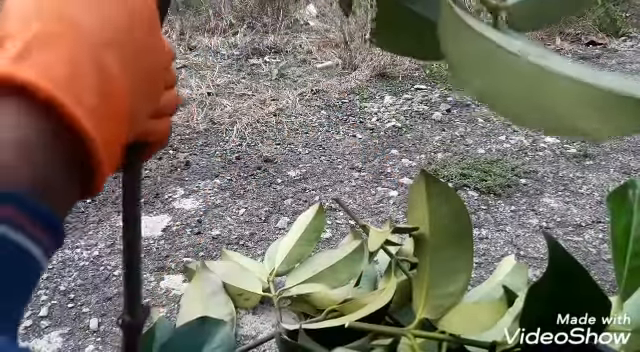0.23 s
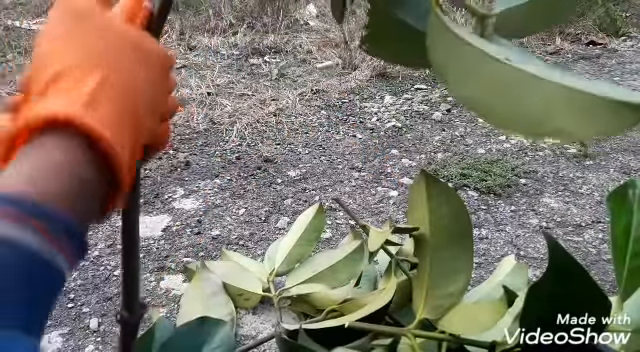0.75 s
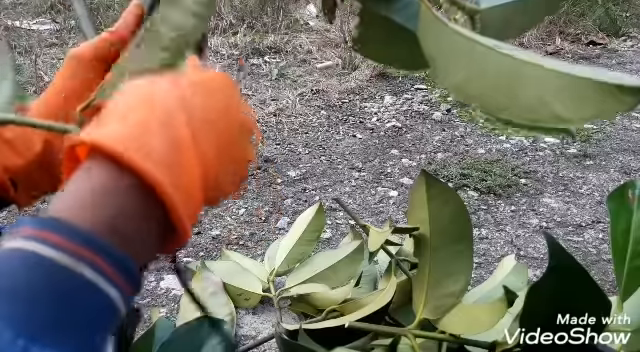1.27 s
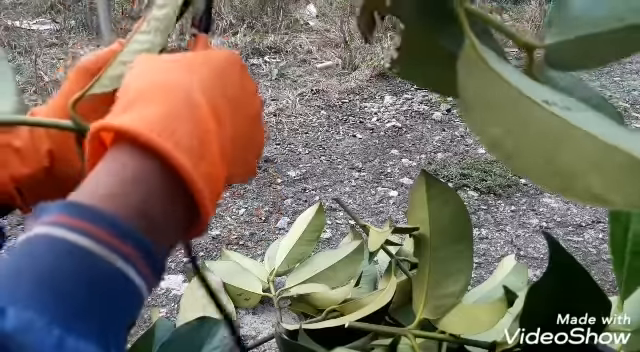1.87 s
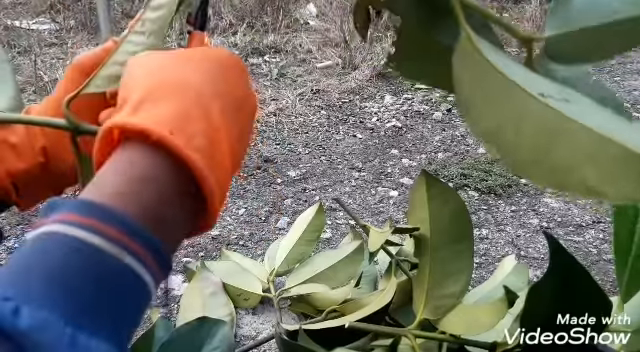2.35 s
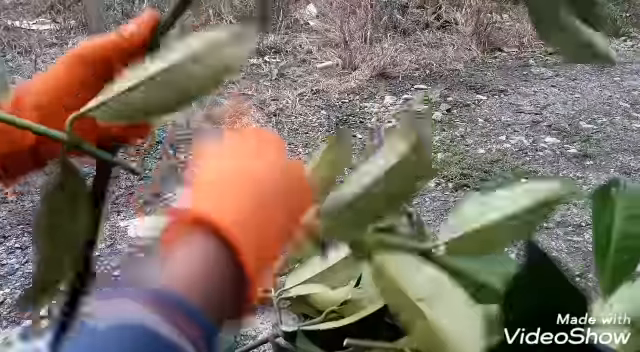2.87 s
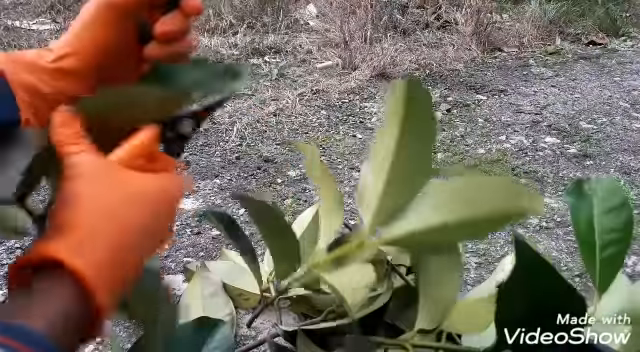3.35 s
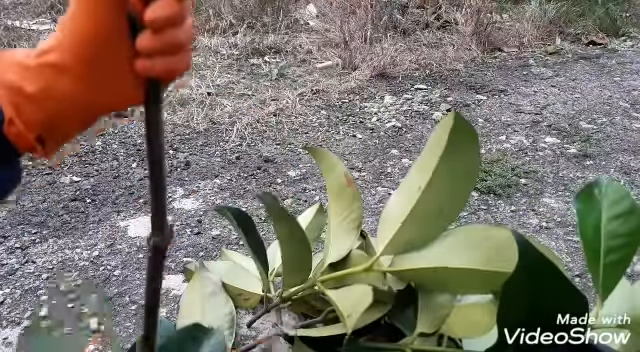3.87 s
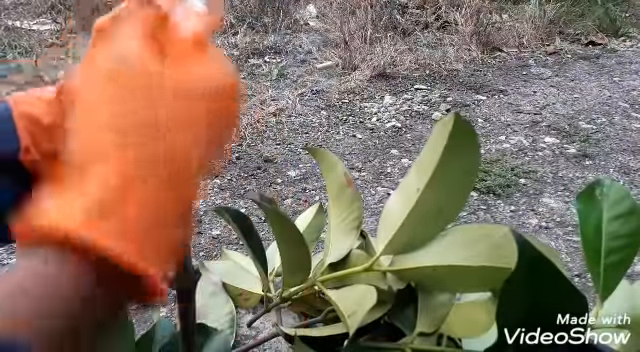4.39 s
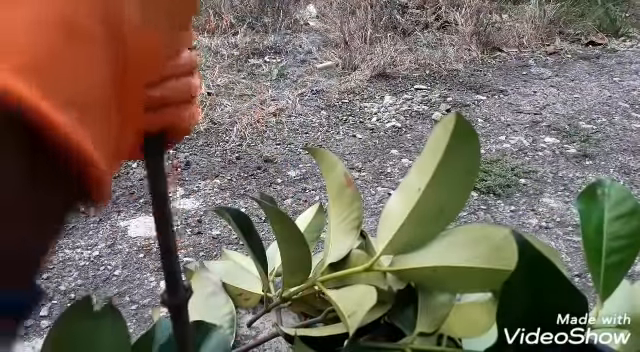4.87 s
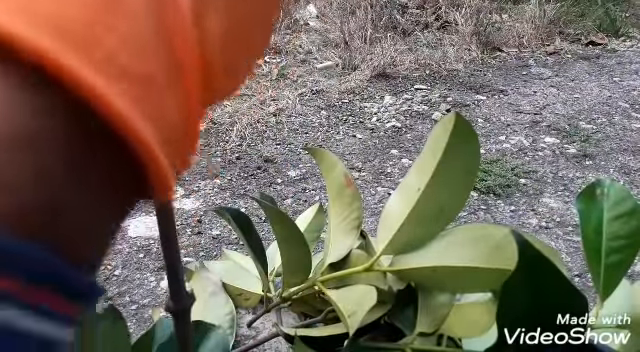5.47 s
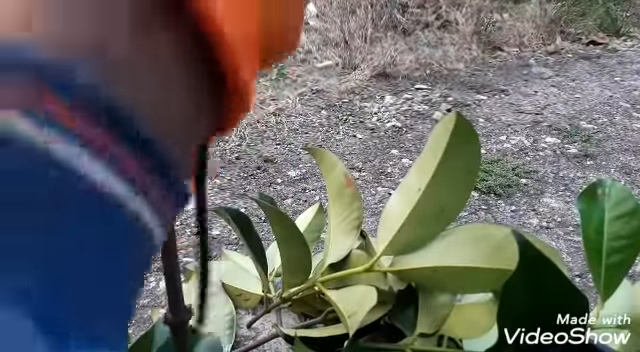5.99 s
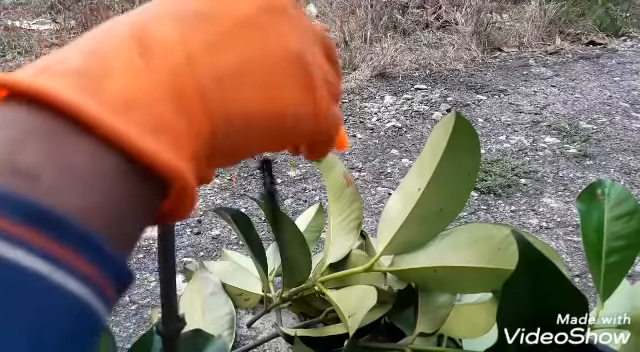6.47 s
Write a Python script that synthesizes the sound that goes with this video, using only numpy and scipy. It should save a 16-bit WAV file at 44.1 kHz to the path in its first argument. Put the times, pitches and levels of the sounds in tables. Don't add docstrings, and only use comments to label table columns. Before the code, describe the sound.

Cicadas sing steadily and a bush cricket chirps about five times a second above a soft far traffic rumble. Up close, stems tick and leaves stir, then a twig cracks sharply. After some knocks a second twig snaps crisply, its leaves shuddering. The branch scrapes, rustles and clatters down onto leaves and gravel, then only small touches remain. Dry open air, nearly mono.

```python
import sys
import numpy as np
from scipy import signal
from scipy.fft import rfft, irfft
from scipy.io import wavfile

SR = 44100
rng = np.random.default_rng(int(sys.argv[2]) if len(sys.argv) > 2 else 0)


def log_audio(samples):
    frames = np.atleast_2d(samples).T
    limited = np.clip(frames, -1, 1)
    pcm = np.round(limited * 32767).astype(np.int16)
    wavfile.write(sys.argv[1], SR, pcm)


def gain_from_db(level_db):
    decades = np.asarray(level_db, float) / 20
    return 10 ** decades


N = 297234

# (frequency [Hz], level [dB per Hz])
TRAFFIC_COLOUR = [(20, -12), (40, -11.5), (153, -3), (280, -11), (383, -12.5), (430, -15.5), (635, -22),
                  (687, -20.5), (920, -20), (1100, -23.5), (4200, -43), (5460, -79), (9240, -120)]
# (time [s], level [dB])
TRAFFIC_LEVEL = [(0, -51), (.9, -50), (2, -51.5), (2.7, -50.5), (2.95, -54), (3.3, -55), (3.45, -49),
                 (3.8, -50.5), (4.3, -51), (4.6, -51.5), (5.9, -52.5), (6.74, -51)]
AIR_DB = -70

# (time [s], near singer level [dB], upper pair level [dB])
CHORUS = [(0, -64, -61), (.6, -64, -61.5), (.9, -62.5, -58), (1.15, -65.5, -59.5), (1.9, -61, -58),
          (2.15, -59, -58), (2.6, -58.5, -61.5), (2.9, -65.5, -61), (3.4, -66.5, -62.5), (3.85, -65, -59),
          (4.3, -65, -60), (4.7, -62.5, -60.5), (5.25, -58.5, -61.5), (5.65, -62.5, -59), (5.84, -65, -60),
          (5.97, -61, -61), (6.4, -62.5, -60), (6.74, -63, -61)]
# (frequency [Hz], width [Hz], level [dB])
NEAR_SONG = [(4916, 590, -3), (5466, 770, -5)]
UPPER_SONG = [(7070, 580, 4.1), (8140, 760, 6.4)]
FAR_SONG = [(11000, 1450, -2), (11490, 410, 0.5)]
FAR_SONG_DB = -65
THROBS_PER_S, THROB_DB = 27, 2.2
SWELLS_PER_S, SWELL_PEAK_S, SWELL_DB = 5.22, 2.08, 2.6

# (first chirp [s], gap [s], peak [dB])
BOUTS = [
    (.0014, 0.19, -55.5),
    (.627, 0.19, -55.5),
    (1.4044, 0.2, -55),
    (2.2468, 0.21, -54),
    (2.8844, 0.21, -58),
    (3.7044, .1945, -54),
    (4.3061, 0.208, -54),
    (5.5558, 0.19, -55.5),
    (6.1554, 0.19, -55),
]
BOUT_CHIRPS = [3, 4, 4, 3, 4, 3, 6, 3, 3]
STROKE_DB = [-4, -1, 0, 0, -2, -8]
STROKE_GAP_S = 0.019
# (frequency [Hz], width [Hz], level [dB])
WING = [(12000, 1300, -12), (13300, 770, -10), (14750, 1300, -9), (15260, 600, -10)]

# (frequency [Hz], level [dB per Hz])
LEAF_BODY = [(150, -11), (250, -0.5), (346, 6.5), (681, 4), (865, -4.5), (2450, -10), (2810, -10.5),
             (5000, -14), (6500, -19), (11000, -120)]
LEAF_EDGE = [(2500, -5), (4500, -5), (5200, -2), (6400, -1), (7800, -4.5), (9400, -8), (11500, -11),
             (12800, -9), (16000, -22)]
# (peak time [s], peak [dB], rise [s], fall [s])
STIRS = [(0.0, -55.5, .05, 0.16), (.23, -62, 0.074, 0.067), (.43, -61, 0.066, 0.21), (.73, -52, 0.11, 0.37),
         (1.0, -43, 0.014, 0.02), (1.12, -53, 0.091, 0.064), (1.33, -54.5, 0.092, 0.19),
         (1.48, -56, 0.039, 0.45), (1.82, -58.5, .2, 0.18), (2.41, -60.5, 0.12, 0.11),
         (2.57, -59, 0.066, 0.41), (2.79, -48, 0.032, 0.35), (3.0, -40.5, 0.11, 0.068),
         (3.169, -46, 0.15, 0.047), (3.4, -50, 0.2, 0.23), (3.56, -47, 0.16, 0.18), (3.77, -52, 0.12, 0.23),
         (3.89, -43.5, 0.081, 0.12), (3.98, -49, .1, 0.14), (4.2, -50.5, 0.025, 0.14),
         (4.34, -56, 0.11, 0.17), (5.03, -56, 0.1, 0.13), (5.65, -55, 0.048, 0.3),
         (5.9, -55.5, 0.46, 0.071), (6.2, -53.5, 0.11, 0.11), (6.35, -58, 0.074, 0.043),
         (6.74, -55, 0.15, .1)]
STIR_SLOPE_DB, REST_DB = 11, -67.5
EDGE_REST_DB, EDGE_FOLLOWS = -73.5, 0.62
RUB_REST_HZ, RUB_TOP_HZ, RUB_OCTAVES_PER_DB = 1100, 2050, 0.14
CRACKLES_PER_S, CRACKLE_FOLLOWS, CRACKLE_DB = 10, 1.2, -63.5
# (start [s], top level [dB], rise [s], 60 dB decay [s], edge over body [dB])
SHUDDERS = [
    (0.749, -31, 0.013, 0.25, 3.5),
    (2.814, -31.5, 0.015, 0.24, 4),
]

# (time [s], peak [dB], frequency [Hz], 60 dB decay [s])
THUDS = [
    (.70, -48, 190, 0.088),
    (0.748, -32, 190, 0.16),
    (1.31, -42, 110, .1),
    (2.811, -31.5, 70, 0.09),
    (3.88, -38, 280, 0.054),
    (3.95, -48, 80, .15),
    (4.18, -46, 70, .12),
    (4.312, -41.5, 296, 0.055),
]
# (start [s], length [s], level [dB], from [Hz], to [Hz])
SCRAPES = [(4.2, 0.016, -39, 5600, 1200), (3.846, .017, -42.5, 4000, 4000),
           (3.823, 0.0196, -38, 2500, 1800), (2.9, .007, -48, 1900, 2800),
           (5.634, 0.022, -49.5, 2100, 2100), (5.657, .014, -54, 2200, 1200),
           (2.912, .016, -39.5, 2200, 1100), (2.982, .02, -44, 1800, 3000), (3.005, .016, -42.5, 695, 1830),
           (4.083, .02, -44.5, 1200, 2800), (4.208, 0.0143, -44.5, 1600, 2500),
           (0.8, 0.0079, -33, 1180, 1500), (.976, 0.0083, -39.5, 3360, 2600),
           (1.322, .012, -42, 3400, 1500), (3.872, .006, -39, 1480, 1150), (3.893, 0.0086, -38, 1800, 2400),
           (3.914, 0.0105, -37, 1490, 2000), (3.5, 0.0142, -41, 1700, 706), (2.85, 0.0085, -37, 2340, 1970),
           (3.043, 0.0078, -37.5, 1010, 2030), (6.68, .035, -51, 1900, 1550), (5.885, .04, -53, 1650, 1600),
           (5.76, .02, -51, 2400, 3100), (6.095, .022, -54, 2900, 3100), (3.11, .04, -46, 2600, 1400),
           (3.15, .035, -46, 1400, 2800), (.775, .03, -40, 5000, 5300), (.727, .005, -46, 7000, 2500)]
# (time [s], peak [dB], ring [Hz], bright crack [dB])
GRIP_KNOCKS = [(.021, -38.5, 850, -24), (0.414, -35, 1960, -30), (.439, -33, 1970, -19),
               (.666, -44, 1920, -8), (0.674, -43, 1810, -17), (.978, -28, 2980, -20),
               (0.998, -25, 1800, -18), (1.011, -30, 1890, -17), (1.055, -35.5, 1810, -13),
               (1.095, -47, 2500, -10), (1.13, -40.5, 1180, -2.5), (1.143, -45, 1100, -17),
               (1.211, -47, 2200, -11), (.999, -32, 3300, -21), (0.999, -34, 780, -21),
               (1.012, -37, 3500, -25), (1.309, -39, 1680, -16), (1.323, -33.5, 3300, -25),
               (1.328, -35, 1390, -18), (1.346, -39, 1210, -17), (1.373, -42, 1890, -19),
               (1.392, -41, 1730, -10), (1.464, -48, 1570, -12), (1.595, -39, 1660, -27),
               (1.842, -34.5, 1810, -21), (1.927, -41, 2080, -13), (2.404, -41, 1510, -15),
               (2.553, -30.5, 1800, -18), (2.58, -41, 1590, -20), (2.646, -44, 1580, -22),
               (2.778, -36, 1570, -7), (2.269, -46, 1510, -15)]
# (time [s], peak [dB], ring [Hz], bright crack [dB])
FALL_KNOCKS = [(2.922, -35.5, 1060, -3.5), (2.964, -29.5, 2390, -16), (3.044, -35, 1450, -16),
               (2.966, -35, 1800, -25), (3.017, -44, 1760, -25), (3.08, -41, 1490, -23),
               (3.173, -42, 1390, -11), (3.242, -39, 1000, -28), (3.185, -44, 2400, -12),
               (3.37, -37, 1590, -11), (3.41, -25.5, 3470, -27), (3.504, -38, 1680, -22),
               (3.569, -29, 1770, -25), (3.614, -35.5, 2850, -10), (3.635, -35, 2200, -12),
               (3.554, -37, 830, -10), (3.747, -45, 2470, -19.5), (3.767, -33, 3840, -27),
               (3.8217, -24, 2170, -6.5), (3.8219, -28.5, 990, -24), (3.822, -25, 3440, -26),
               (3.855, -28, 4470, -28), (3.875, -31, 1500, -8), (3.88, -23.5, 1230, -17),
               (3.897, -31, 1590, -25), (3.906, -19.5, 2050, -24), (3.9065, -22, 1430, -28),
               (3.908, -22, 3240, -22), (3.918, -30, 1540, -17), (3.936, -35, 2110, -15),
               (3.95, -37, 810, -23), (4.005, -27.5, 3500, -28), (4.006, -29, 1460, -25),
               (4.087, -37, 2740, -30), (4.1, -35, 2790, -15), (4.03, -42, 1240, -15),
               (4.062, -44, 1570, -20), (4.157, -46, 1490, -20), (4.176, -34.5, 910, -23),
               (4.177, -31, 2880, -25), (4.182, -30, 2110, -27), (4.21, -38, 1760, -24),
               (4.31, -44, 1870, -20), (4.324, -41, 1920, -20)]
# (time [s], peak [dB], ring [Hz], bright crack [dB])
LAST_KNOCKS = [(5.615, -43, 2230, -22), (5.641, -41, 2250, -29), (5.648, -43, 1900, -28),
               (5.653, -32, 2180, -31), (5.685, -46, 1720, -22), (5.712, -47, 1600, -16),
               (5.7225, -34, 1620, -28), (5.724, -32, 3300, -20), (5.737, -41, 1500, -22),
               (5.738, -37, 3300, -25), (6.266, -35.5, 2140, -24), (6.355, -41.5, 2780, -13),
               (6.575, -45, 1300, 0), (6.701, -44, 1720, -25), (6.72, -43, 2450, -22)]
KNOCK_SPREAD_S = 0.002998

# (time [s], peak [dB], ring [Hz], bright crack [dB], spread [s])
FIRST_CUT = [
    (.7428, -22, 1510, -13, 0.00072),
    (.7437, -18, 1030, -19, 0.0013),
    (.7450, -5, 1230, -9, 0.00092),
    (.7474, 6, 5040, -31, 0.00098),
    (.7491, -7.5, 1240, -45, 0.00061),
    (.7503, -0.5, 4800, -12, 0.00094),
    (.7522, -9, 4800, -36, 0.0014),
    (.7385, -30, 3600, -20, 0.0083),
]
SECOND_CUT = [
    (2.8038, -25, 2000, -9, 0.0012),
    (2.8060, -11.5, 1860, -12, 0.00079),
    (2.8074, -0.5, 3700, -12, 0.0012),
    (2.8085, -5.5, 7400, -17, 0.00058),
    (2.8099, -5.5, 5500, -5, 0.00071),
    (2.8078, -8.5, 6130, -25, 0.0011),
    (2.8110, -14.5, 2637, -10, 0.0016),
    (2.8130, -13, 3800, -17, 0.002),
]
# (frequency [Hz], level [dB], 60 dB decay [s])
FIRST_RING = [
    (530, -21.5, 0.058),
    (723, -27, 0.11),
    (830, -28, 0.07),
    (1030, -22, 0.057),
    (4300, -30, 0.027),
    (401, -29, 0.095),
    (5120, -33, 0.1),
    (4980, -28, 0.08),
]
SECOND_RING = [
    (715, -24, 0.036),
    (1390, -22.5, 0.024),
    (2790, -20, 0.025),
    (333, -25.5, 0.02),
    (12670, -12, 0.018),
]

# (deepest [s], depth [dB], down [s], back [s])
DUCK = (3.5, -3, 0.3, 0.35)
# (frequency [Hz], width [Hz], depth [dB])
PORT_DIPS = [(6420, 600, -6), (9070, 2600, -5.5)]
CUTOFF_HZ = 15720


def rms_one(x):
    return x / np.sqrt(np.mean(x ** 2) + 1e-20)


def in_time(rows):
    s, *columns = np.transpose(rows)
    return [np.interp(np.arange(N) / SR, s, c) for c in columns]


def drift(rate):
    r = np.exp(-80 * np.pi * rate / SR)
    noise = rng.standard_normal(N // 40 + 2002)
    slow = signal.lfilter([1], [1, -2 * r, r * r], noise)[2000:]
    return np.interp(np.arange(N) / 40, np.arange(len(slow)), rms_one(slow))


def ring(clicks, hz, t60):
    r, w = gain_from_db(-60 / (t60 * SR)), 2 * np.pi * hz / SR
    return signal.lfilter([0, np.sin(w)], [1, -2 * r * np.cos(w), r * r], clicks + 1e-18)


def resonate(x, peaks):
    out = 0
    for k, (hz, width_hz, level_db) in enumerate(peaks):
        r = np.exp(-np.pi * width_hz / SR)
        b = [1 - r * r, 0, r * r - 1]
        a = [2, -4 * r * np.cos(2 * np.pi * hz / SR), 2 * r * r]
        once = signal.lfilter(b, a, x)
        out = out + (-1) ** k * gain_from_db(level_db) * signal.lfilter(b, a, once)
    return rms_one(out)


def coloured(x, spectrum):
    hz, level_db = np.transpose(spectrum)
    grid = np.arange(N // 2 + 1) * SR / N + 1
    gain = gain_from_db(np.interp(np.log(grid), np.log(hz), level_db))
    return rms_one(irfft(rfft(x) * gain, N))


def grains(per_s, spread_db):
    sizes = gain_from_db(spread_db * np.minimum(rng.exponential(1, N), 4)) * rng.choice([-1, 1], N)
    return sizes * (rng.random(N) < per_s / SR)


def snaps(rows, cycles, side_db, top_hz, fade, breadth=0):
    out, t = np.zeros(N + 2048), np.arange(2048) / SR
    high = signal.butter(2, [3800, top_hz], "band", fs=SR, output="sos")
    for (s, peak_db, hz, crack_db, spread_s), draw in zip(rows, rng.random((len(rows), 12))):
        clicks = np.zeros(2048)
        clicks[0] = 1
        after = 1 + (draw[:5] * 1.5 * spread_s * SR).astype(int)
        clicks[after] = (1.83 * draw[5:10] - .9) * (1 - fade * draw[:5])

        body = ring(clicks, hz, cycles / hz)
        side_gain = gain_from_db(side_db + breadth * crack_db)
        for ratio in (0.59 + 0.048 * draw[10], 1.328 + 0.45 * draw[11], min(2.2, 6500 / hz)):
            body += side_gain * ring(clicks, hz * ratio, cycles / hz)
        band = signal.butter(1, [.5 * hz, min(3 * hz, 15000)], "band", fs=SR, output="sos")
        body = signal.sosfilt(band, body)

        crack = signal.sosfilt(high, rng.standard_normal(2048) * np.exp(-t / spread_s))
        snap = body / np.abs(body).max() + gain_from_db(crack_db + 5.0) * crack / np.abs(crack).max()
        at = round(s * SR)
        out[at:at + 2048] += gain_from_db(peak_db) * snap
    return out[:N]


def traffic():
    level_db, = in_time(TRAFFIC_LEVEL)
    rumble = coloured(rng.standard_normal(N), TRAFFIC_COLOUR) * gain_from_db(.8 * drift(4))
    drone = resonate(rng.standard_normal(N), [(152.64, 3.9, 4.5), (390.7, 21, -15.5)])
    return gain_from_db(level_db) * (rumble + gain_from_db(-9.5) * drone)


def cicadas():
    near_db, upper_db = in_time(CHORUS)
    throb_db = THROB_DB * np.sin(2 * np.pi * np.cumsum(THROBS_PER_S * (1 + 0.11 * drift(2.7))) / SR)
    throb_db += SWELL_DB * np.cos(2 * np.pi * SWELLS_PER_S * (np.arange(N) / SR - SWELL_PEAK_S))
    near = resonate(grains(2500, 0.86), NEAR_SONG)
    near *= gain_from_db(near_db + 2.5 + 1.1 * drift(30) + 0.88 * drift(17) + throb_db)
    upper = resonate(rng.standard_normal(N), UPPER_SONG) * gain_from_db(upper_db + 0.5 + 2.0 * drift(7.5))
    far = resonate(rng.standard_normal(N), FAR_SONG) * gain_from_db(FAR_SONG_DB + 0.87 * drift(2.0))
    return near + upper + far


def bush_cricket():
    strokes = np.zeros(N)
    for (first_s, gap_s, peak_db), count in zip(BOUTS, BOUT_CHIRPS):
        for k in range(count):
            s = first_s + k * gap_s
            at = ((s + STROKE_GAP_S * np.arange(len(STROKE_DB))) * SR).astype(int)
            uneven_db = rng.normal(0, 0.82, len(at))
            strokes[at] = gain_from_db(peak_db - 4.5 + np.array(STROKE_DB) + uneven_db)
    puff = np.hanning(int(.018 * SR))
    direct = signal.fftconvolve(strokes, puff)[int(.007 * SR):][:N]
    fade = gain_from_db(-60 / (.45 * SR))
    blur = signal.lfilter([gain_from_db(-64)], [1, -fade], direct)
    noise = rng.standard_normal((2, N))
    return direct * resonate(noise[0], WING) + blur * resonate(noise[1], WING)


def stirring():
    t = np.arange(0, N + 64, 64) / SR
    power = gain_from_db(2 * REST_DB)
    for s, peak_db, rise_s, fall_s in STIRS:
        away = np.where(t < s, (s - t) / rise_s, (t - s) / fall_s)
        power = power + gain_from_db(2 * (peak_db - STIR_SLOPE_DB * away))
    return np.interp(np.arange(N) / SR, t, 10 * np.log10(power))


def leaf_grains(per_s, spread_db, centre_hz, patchy_db):
    rub, dealt = grains(per_s, spread_db), rng.integers(0, 14, N)
    hz, level_db = np.transpose(LEAF_BODY)
    body = 0
    for k, p_hz in enumerate(np.geomspace(350, 4300, 14)):
        at = np.flatnonzero(rub * (dealt == k))
        octaves_off = np.log2(p_hz / (centre_hz + np.zeros(N))[at])
        lean_db = -3.5 * octaves_off ** 2 + patchy_db * drift(20.5)[at]
        gain = gain_from_db(np.interp(p_hz, hz, level_db) + lean_db) * p_hz
        t60, clicks = 12 / p_hz, np.zeros(N)
        clicks[at] = gain * rub[at]
        body = body + p_hz * ring(ring(clicks, p_hz, t60), p_hz, t60)
    return rms_one(body), coloured(rub + .5 * rng.standard_normal(N), LEAF_EDGE)


def crackle(swing_db):
    ticks = grains(CRACKLES_PER_S * gain_from_db(CRACKLE_FOLLOWS * swing_db), 3.5)
    ticks *= gain_from_db(CRACKLE_DB + 0.72 * swing_db)
    dealt = rng.integers(0, 8, N)
    pitches_hz = np.geomspace(1000, 5000, 8)
    return sum(ring(ticks * (dealt == k), hz, 6.3 / hz) for k, hz in enumerate(pitches_hz))


def leaves():
    body_db = stirring()
    swing_db = body_db - REST_DB
    centre_hz = np.minimum(RUB_REST_HZ * 2 ** (RUB_OCTAVES_PER_DB * swing_db), RUB_TOP_HZ)
    body, edge = leaf_grains(4500 * gain_from_db(3 * drift(40)), 2.74, centre_hz, patchy_db=2.5)
    edge_db = EDGE_REST_DB + EDGE_FOLLOWS * swing_db + 8.0
    return gain_from_db(body_db - 1.0) * body + gain_from_db(edge_db) * edge + crackle(swing_db)


def shudder():
    body, edge = leaf_grains(9000, 3.3, 1950, patchy_db=5.5)
    out = np.zeros(N)
    for s, top_db, rise_s, t60, tilt_db in SHUDDERS:
        age = np.maximum(np.arange(N) / SR - s, 0)
        swell = gain_from_db(top_db - 60 * age / t60) * (1 - np.exp(-age / rise_s))
        out += swell * (body + gain_from_db(tilt_db) * edge)
    return out


def thuds():
    out, t = np.zeros(N + SR), np.arange(SR // 2) / SR
    for s, peak_db, hz, t60 in THUDS:
        out[round(s * SR):][:len(t)] += gain_from_db(peak_db - 60 * t / t60) * np.sin(2 * np.pi * hz * t)
    return out[:N]


def scrapes():
    out = np.zeros(N)
    all_slips = rng.standard_normal((len(SCRAPES), 2, 2048))
    for (s, length_s, level_db, from_hz, to_hz), slips in zip(SCRAPES, all_slips):
        part = np.clip(np.arange(2048) / (length_s * SR), 0, 1)
        turn = 2 * np.pi * np.cumsum(from_hz * (to_hz / from_hz) ** part) / SR
        slow = signal.lfilter([1], [1, -np.exp(-2 * np.pi * 600 / SR)], slips ** 3)
        rub = rms_one(slow[0] * np.cos(turn) + slow[1] * np.sin(turn))
        out[round(s * SR):][:2048] += gain_from_db(level_db) * rub * np.sin(np.pi * part ** 0.52) ** .5
    return out


def knocks():
    rows = [(*row, KNOCK_SPREAD_S) for row in GRIP_KNOCKS + FALL_KNOCKS + LAST_KNOCKS]
    return snaps(rows, 12.9, -2.1, top_hz=9000, fade=0.65, breadth=0.44)


def cut(fibres, modes, main):
    blow = np.zeros(N)
    blow[round(fibres[main][0] * SR)] = 1
    ringing = sum(gain_from_db(db) * ring(blow, hz, t60) for hz, db, t60 in modes)
    return snaps(fibres, 11.8, -6.5, top_hz=14500, fade=0.38) + ringing


def scene():
    shears = cut(FIRST_CUT, FIRST_RING, main=3) + cut(SECOND_CUT, SECOND_RING, main=2)
    air = gain_from_db(AIR_DB) * rng.standard_normal(N)
    handling = gain_from_db(2.5) * knocks() + leaves() + shudder() + thuds() + scrapes()
    mono = shears + handling + cicadas() + bush_cricket() + traffic() + air
    return np.array([mono, mono])


def ducking():
    s, depth_db, down_s, back_s = DUCK
    t = np.arange(N) / SR - s
    return gain_from_db(depth_db * np.exp(-(t / np.where(t < 0, down_s, back_s)) ** 2))


def roll_off(x):
    return signal.sosfilt(signal.butter(12, 16450, fs=SR, output="sos"), x)


def record(dry):
    mid = signal.sosfilt(signal.butter(3, 56, "high", fs=SR, output="sos"), dry[0] * ducking())
    for hz, width_hz, dip_db in PORT_DIPS:
        mid = mid - (1 - gain_from_db(dip_db)) * signal.lfilter(*signal.iirpeak(hz, hz / width_hz, fs=SR), mid)
    mid = .9 * np.tanh(mid / .9)
    mid = signal.sosfilt(signal.ellip(12, .5, 60, CUTOFF_HZ, fs=SR, output="sos"), mid)

    smear, top = rng.standard_normal(600), gain_from_db(-43)
    limited = top * np.tanh(mid / top)
    side = signal.fftconvolve(limited, smear / np.linalg.norm(smear))[300:N + 300]
    bright = signal.sosfilt(signal.butter(2, 7500, "high", fs=SR, output="sos"), side)
    body = signal.sosfilt(signal.butter(1, 450, "high", fs=SR, output="sos"), side)
    side = gain_from_db(-15) * body + gain_from_db(-18) * bright
    return roll_off(np.array([mid + side, mid - side]))


dry = scene()
out = record(dry)
log_audio(out)
```